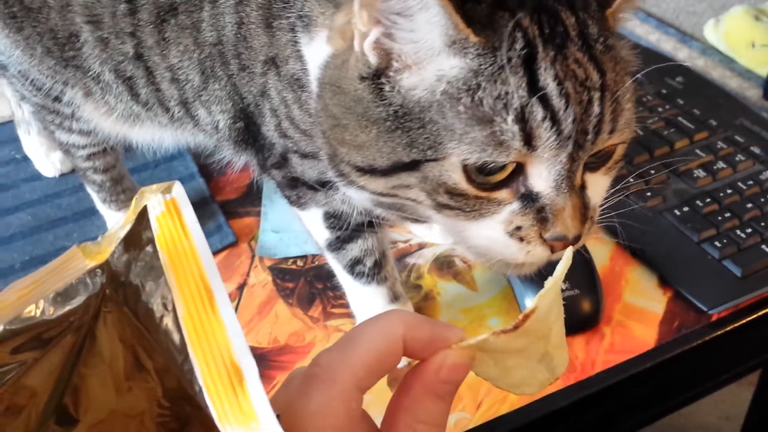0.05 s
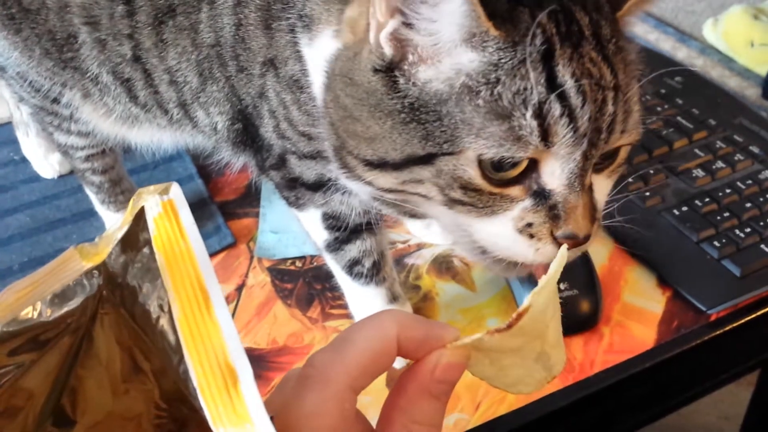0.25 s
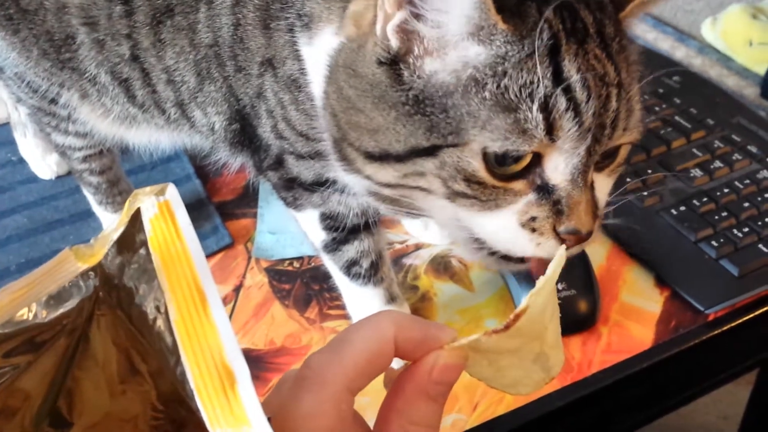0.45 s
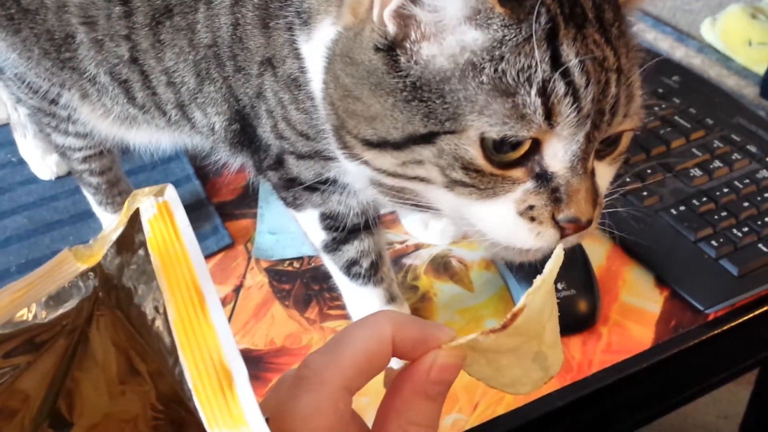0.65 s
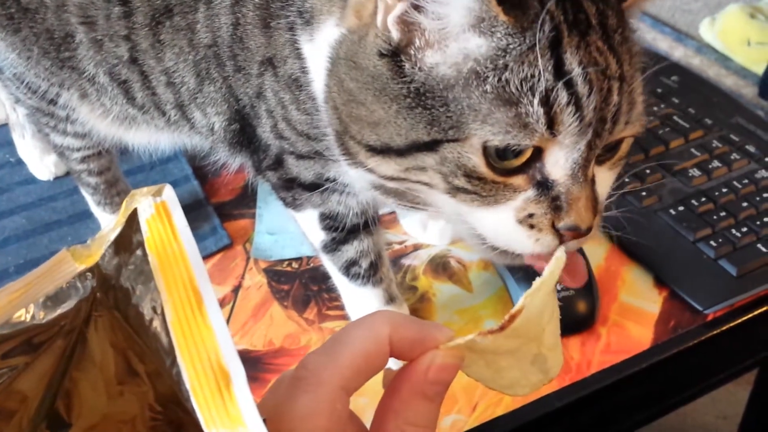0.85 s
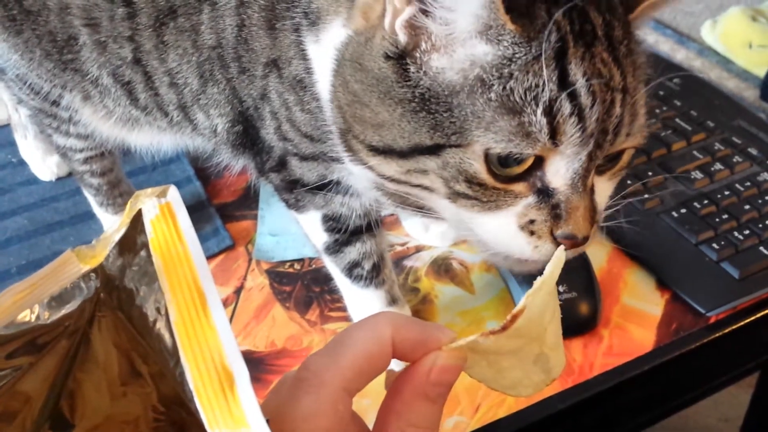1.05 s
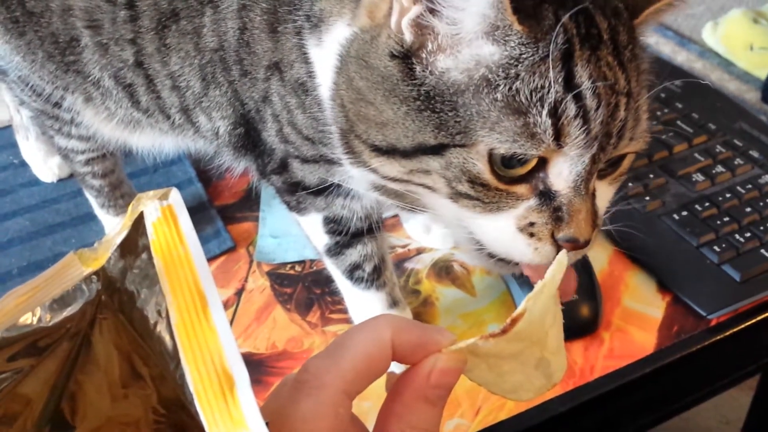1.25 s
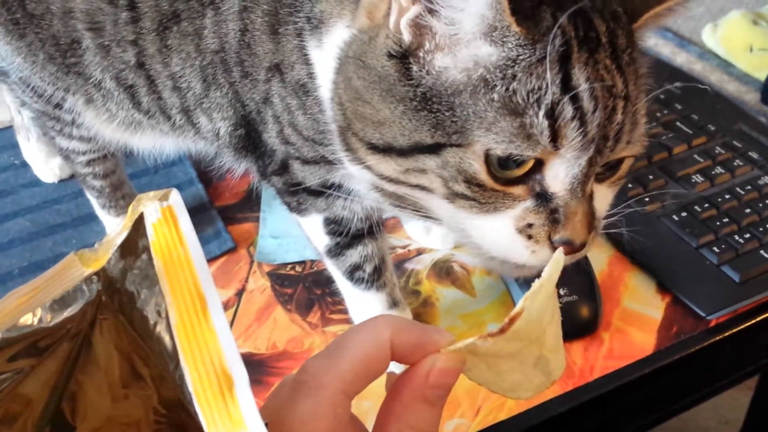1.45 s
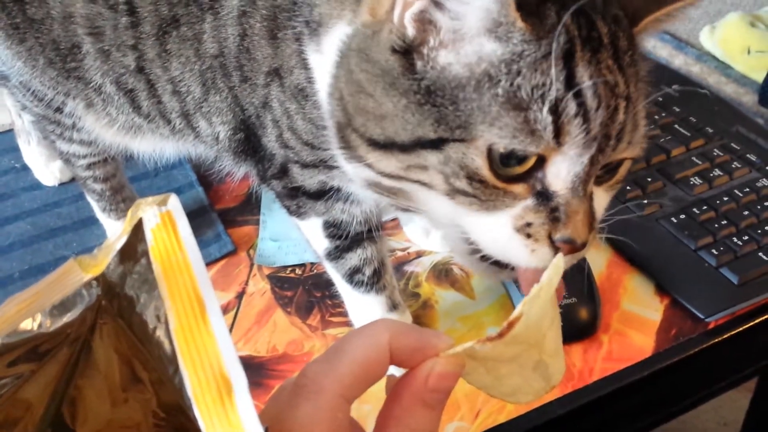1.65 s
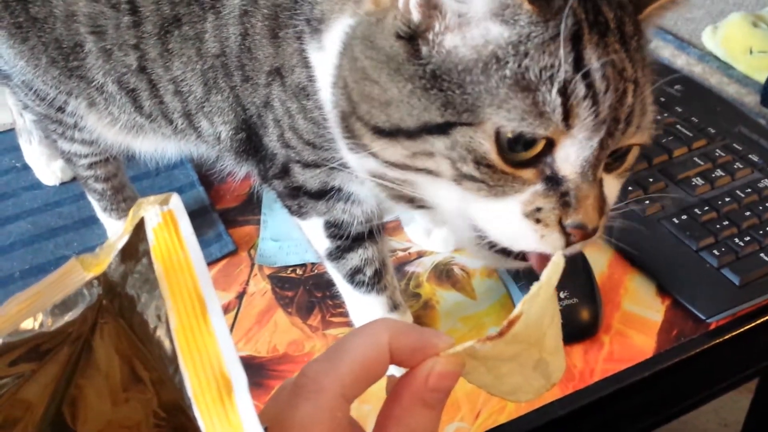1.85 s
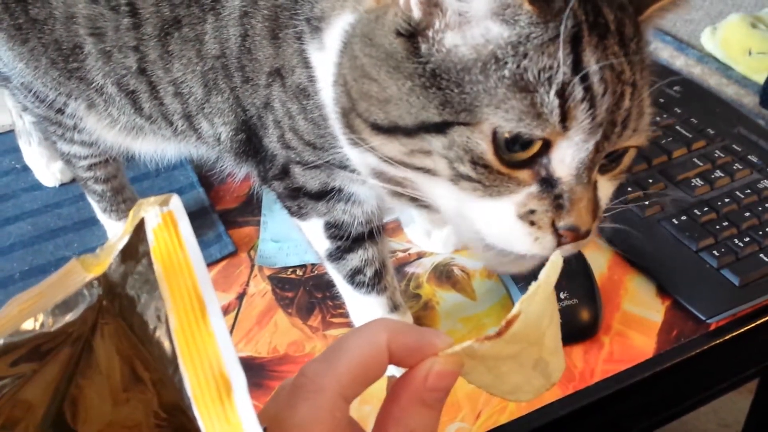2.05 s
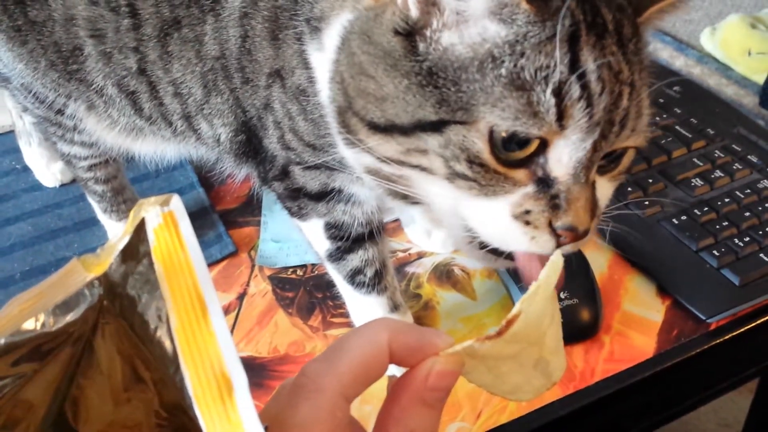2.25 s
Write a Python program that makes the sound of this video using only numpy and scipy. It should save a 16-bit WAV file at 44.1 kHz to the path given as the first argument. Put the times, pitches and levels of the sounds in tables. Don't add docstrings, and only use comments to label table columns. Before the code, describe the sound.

A cat licking a thin potato crisp very close to a stereo microphone: a sharp bright crack early, faint rasping licks and wet ticks, a softer crack midway, a small pop late, low appliance hum in a small room.

```python
import sys
import numpy as np
from scipy import signal
from scipy.io import wavfile

SR = 44100
rng = np.random.default_rng(int(sys.argv[2]) if len(sys.argv) > 2 else 0)


def level_to_linear(level):
    exponent = np.asarray(level, float) / 20
    return 10 ** exponent


def unload_audio(sound):
    columns = np.transpose(np.atleast_2d(sound))
    steps = np.round(np.clip(columns, -1, 1) * 32767)
    wavfile.write(sys.argv[1], SR, steps.astype(np.int16))


N = 101430
RIGHT_LEADS_S = 0.00016
SWELL_SHAPE = 1.4
CRACK_S, SOFT_CRACK_S = .2438, 1.3256


def ports(left_db, right_db):
    return level_to_linear(np.array([[left_db], [right_db]]))


def pan(left_over_right_db):
    return ports(left_over_right_db / 2, -left_over_right_db / 2)


def rms_one(x):
    return x / np.sqrt(np.mean(x ** 2) + 1e-20)


def at_hz(points, hz, column=1):
    points = np.array(points)
    return np.interp(np.log(hz), np.log(points[:, 0]), points[:, column])


def resonance(x, hz, width_hz):
    r = np.exp(-np.pi * width_hz / SR)
    zeros = np.array([1, 0, -1]) * (1 - r * r) / 2
    poles = [1, -2 * r * np.cos(2 * np.pi * hz / SR), r * r]
    return signal.lfilter(zeros, poles, x)


def narrow(x, hz, width_hz):
    return rms_one(resonance(resonance(x, hz, width_hz), hz, width_hz))


def bands(per_octave=3):
    edges = 30 * 2 ** np.arange(0, 9.2, 1 / per_octave)
    settle = 4000
    white = rng.standard_normal((2, 2, N + settle))
    for k, (low, high) in enumerate(zip(edges, edges[1:])):
        sos = signal.butter(2, [low, high], "band", fs=SR, output="sos")
        yield np.sqrt(low * high), signal.sosfilt(sos, white[k % 2])[:, settle:]


def add_mode(out, start_s, hz, ms, left_db, right_db):
    first = int(start_s * SR) - 20
    n = np.arange(first, min(first + 4000, N))
    t = np.maximum(n / SR - start_s + np.array([[0], [RIGHT_LEADS_S]]), 0)
    u = t / ms * 1000
    envelope = (u * np.exp(1 - u)) ** SWELL_SHAPE
    out[:, n] += ports(left_db, right_db) * envelope * np.sin(2 * np.pi * hz * t)


def timed_modes(table):
    out = np.zeros((2, N))
    for start_s, hz, left_db, right_db, ms in table:
        add_mode(out, start_s, hz, ms, left_db, right_db)
    return out


def stroke(centre_s, db, length_s):
    return level_to_linear(db) * np.exp(-.5 * ((np.arange(N) / SR - centre_s) / length_s) ** 2)


def grains(per_s):
    return rng.standard_normal((2, N)) * (rng.random((2, N)) < per_s / SR)


# time_s, level_db
HUM_SWELL = [(0, 2), (.35, 3), (.7, -0.5), (.88, -8), (1.1, 1), (1.5, 0.5), (1.85, 1.5), (2.1, 3.5),
             (2.3, -5.5)]


def hum_swell():
    return level_to_linear(np.interp(np.arange(N) / SR, *np.transpose(HUM_SWELL)))


# pitch_hz, width_hz, level_db (rms)
HUM_MODES = [(122, 13.4, -64.5), (165.5, 8.1, -67), (220.2, 31, -66), (251.6, 10, -63.5),
             (281.1, 28, -59.5), (420, 23, -82.5), (767, 36, -77), (1004, 300, -76)]
# pitch_hz, left_over_right_db
PORT_LEAN = [(100, 1), (290, -2), (1400, 2.5), (3500, -0.5), (5500, -3.5), (7500, -12.5), (10000, -3.5),
             (15000, -1)]
HUM_SIDE_DB = -18.5


def hum():
    out = 0
    for hz, width_hz, db in HUM_MODES:
        noise = rng.standard_normal((2, N + SR))
        ringing = resonance(resonance(noise, hz, width_hz), hz, 2 * width_hz)
        mid, side = rms_one(ringing[:, SR:])
        pair = mid + level_to_linear(HUM_SIDE_DB) * side * [[1], [-1]]
        out = out + level_to_linear(db) * pair * pan(at_hz(PORT_LEAN, hz))
    return out


# pitch_hz, level_db (per Hz)
AIR_SPECTRUM = [(18, -67), (30, -27.5), (112, -7), (189, -8.5), (266, -10.5), (554, -17), (2120, -25),
                (6720, -29.5), (16000, -33)]
# pitch_hz, likeness (-1 opposite, 0 unrelated, 1 same)
PORT_LIKENESS = [(60, 0.79), (180, 1), (550, 0.5), (1650, 0.042), (4970, -0.21), (15000, 0.052)]
AIR_DB = -58


def air():
    out = 0
    for hz, (mid, side) in bands():
        alike = np.clip(at_hz(PORT_LIKENESS, hz), -1, 1)
        pair = np.sqrt(1 + alike) * mid + np.sqrt(1 - alike) * side * [[1], [-1]]
        out = out + pair * level_to_linear(at_hz(AIR_SPECTRUM, hz)) * pan(at_hz(PORT_LEAN, hz))
    return level_to_linear(AIR_DB) * rms_one(out)


# pitch_hz, width_hz, left_db, right_db
PORT_CAVITIES = [(5500, 3000, -71, -79), (6970, 900, -84.5, -74.5), (8300, 1400, -81.5, -73)]


def port_hiss():
    out = 0
    for hz, width_hz, left_db, right_db in PORT_CAVITIES:
        out = out + narrow(rng.standard_normal((2, N)), hz, width_hz) * ports(left_db, right_db)
    return out


# start_s, level_db
# (peak), pitch_hz, rise_and_fall_ms, left_over_right_db
WET_TICKS = [(.1482, -41.5, 890, 2.0, 0), (.1515, -50, 1080, 1.5, 0), (.1638, -42.5, 1010, 1, 0),
             (.1625, -48, 1700, 2, 6), (.1632, -56, 2980, 1.2, 11.5), (.689, -52, 3200, .25, 16),
             (.92, -55, 3000, .8, 6), (.937, -56, 5700, .8, 8), (.954, -55, 6500, .8, 0),
             (1.037, -53, 1720, 1.5, 6), (1.045, -49, 1720, .9, 6), (1.045, -51, 1100, .8, 3),
             (1.16, -56, 1530, .35, 13), (1.3495, -54, 2400, 1.1, 16), (1.471, -56, 5000, .4, 6),
             (1.556, -53, 3000, .2, 8), (1.6062, -54, 2200, .6, 10), (1.615, -50.5, 5900, .5, 17.5),
             (1.6142, -53, 5000, .4, 14), (1.6148, -55, 2100, .7, 14), (1.898, -50, 420, 2.6, 12),
             (1.911, -50.5, 85, 10, -2), (1.919, -56, 1900, 1, 6), (1.975, -55, 5000, .6, 8),
             (2.067, -48.5, 2920, .55, 10.5), (2.102, -55, 2200, .45, 9), (2.176, -56, 6800, .8, 0),
             (2.23, -53, 6500, .9, -6), (2.288, -58, 6000, .8, 6), (.251, -44, 400, 3.8, 0),
             (.259, -50, 260, 6, 0)]


def ticks():
    out = np.zeros((2, N))
    for start_s, db, hz, ms, pan_db in WET_TICKS:
        add_mode(out, start_s, hz, ms, db + pan_db / 2, db - pan_db / 2)
    return out


# pitch_hz, left_db, right_db, rise_and_fall_ms
CRACK_MODES = [(1710, -16.5, -24.5, .47), (2090, -21.5, -50, .46), (2680, -36, -38, 1.0),
               (3620, -31, -27, .6), (4330, -27, -36, 1.0), (5200, -39.5, -15.5, .59),
               (5690, -4.5, -24.5, .54), (5970, -14, -31.5, .79), (7720, -30.5, -24.5, .71),
               (8440, -57, -27, .7), (8940, -27.5, -8, .33), (9590, -29.5, -24.5, .49),
               (13030, -33, -21, .2), (14000, -41.5, -25.5, .43)]
# delay_ms, left_db, right_db
CRACK_ECHOES = [(2.2, -22, -22), (5.0, -33, -40)]
# start_s, pitch_hz, left_db, right_db, rise_and_fall_ms
OBJECT_ANSWERS = [
    (0.2457, 5410, -16.0, -27.5, 0.51),
    (0.2452, 8960, -49.5, -32.5, 0.94),
    (0.2455, 2090, -37.5, -42.5, 0.99),
    (0.2452, 10540, -40.5, -28.5, 0.44),
    (0.2456, 7170, -35.5, -37.0, 0.62),
]


def loud_crack():
    out = timed_modes(OBJECT_ANSWERS)
    for hz, left_db, right_db, ms in CRACK_MODES:
        for delay_ms, echo_left_db, echo_right_db in [(0, 0, 0)] + CRACK_ECHOES:
            start_s = CRACK_S + delay_ms / 1000
            add_mode(out, start_s, hz, ms, left_db + echo_left_db, right_db + echo_right_db)
    return out


# pitch_hz, left_db, right_db, t60_s
TAIL_BANDS = [(400, -78, -73, 0.27), (900, -70, -54, 0.14), (1850, -50.5, -54.5, 0.28),
              (3200, -59, -51.5, 0.18), (4600, -58.5, -64, 0.43), (6600, -65, -61, 0.36),
              (8360, -70, -58.5, 0.34), (11000, -77.5, -60.5, .15), (14000, -89.5, -62, .12)]
# pitch_hz, width_hz, left_db, right_db, t60_s
PORT_RINGS = [(5500, 1300, -38, -46, 0.34), (8300, 1200, -65, -52, 0.197)]
TAIL_START_S, TAIL_EARLY_DB, SOFT_TAIL_DB = 0.0075, -9, -18.5
TAIL_LUMP_DB, TAIL_LUMPS_PER_S = 1.6, 300


def dying(t60_s):
    t = np.arange(N) / SR
    out = 0
    for crack_s, db in [(CRACK_S, 0), (SOFT_CRACK_S, SOFT_TAIL_DB)]:
        fall_db = -60 * np.maximum(t - crack_s, 0) / t60_s
        early_db = TAIL_EARLY_DB * (t < crack_s + TAIL_START_S)
        out = out + (t > crack_s + .002) * level_to_linear(db + fall_db + early_db)
    return out


def lumps():
    r = np.exp(-2 * np.pi * TAIL_LUMPS_PER_S / SR)
    slow = signal.lfilter([1], [1, -2 * r, r * r], rng.standard_normal((2, N)))
    return level_to_linear(TAIL_LUMP_DB * rms_one(slow))


def tails():
    out = 0
    for hz, noise in bands():
        level = ports(at_hz(TAIL_BANDS, hz), at_hz(TAIL_BANDS, hz, column=2)) * level_to_linear(22.5)
        out = out + dying(at_hz(TAIL_BANDS, hz, column=3)) * noise * level
    for hz, width_hz, left_db, right_db, t60_s in PORT_RINGS:
        ring = narrow(rng.standard_normal((2, N)), hz, width_hz)
        out = out + dying(t60_s) * ring * ports(left_db, right_db)
    return lumps() * out


# start_s, pitch_hz, left_db, right_db, rise_and_fall_ms
SPLINTER_MODES = [(.2518, 6550, -31, -39.5, .8), (.2522, 3300, -40, -32, .6), (.254, 3200, -36, -40, .5),
                  (.2528, 1990, -34, -50, .5), (.2533, 8500, -50, -33, .5), (.2546, 1500, -32, -36, .4),
                  (.255, 4500, -37, -48, .4), (.2575, 8200, -52, -41, .5), (.258, 5600, -36, -49, .8),
                  (.2612, 8500, -53, -37, .5), (.265, 5700, -38, -50, .7), (.265, 7500, -55, -41, .4),
                  (.2675, 5760, -36, -46, .7), (.2672, 7300, -50.5, -38, .5), (.273, 5600, -36, -41, .8),
                  (.279, 5500, -38, -50, .9)]


def splinters():
    return timed_modes(SPLINTER_MODES)


# centre_s, level_db, length_s, pitch_hz
LICK_STROKES = [
    (0.468, -67, .01, 6800),
    (.5, -63.5, 0.013, 6300),
    (0.936, -70, 0.0081, 5800),
    (0.947, -68, 0.0085, 6660),
    (1.342, -67, 0.013, 5170),
    (1.39, -64, 0.0081, 6900),
    (1.881, -66, 0.031, 5950),
    (2.29, -69.5, 0.0073, 6000),
]
RASP_WIDTH_HZ, RASP_GRAINS_PER_S, RASP_PAN_DB = 1600, 4000, 10


def rasp():
    barbs = grains(RASP_GRAINS_PER_S)
    out = 0
    for centre_s, db, length_s, hz in LICK_STROKES:
        out = out + stroke(centre_s, db, length_s) * narrow(barbs, hz, RASP_WIDTH_HZ)
    return out * pan(RASP_PAN_DB)


# centre_s, level_db, length_s, low_hz, high_hz
WET_SMACKS = [
    (.498, -66, .01, 1500, 5000),
    (1.048, -63, .004, 500, 1900),
    (1.334, -57, .005, 300, 1500),
    (1.345, -64, .007, 2000, 7000),
    (1.9, -61, .003, 1200, 3300),
]
SMACK_GRAINS_PER_S, SMACK_PAN_DB = 6100, 7


def smacks():
    drops = grains(SMACK_GRAINS_PER_S)[0]
    out = 0
    for centre_s, db, length_s, low_hz, high_hz in WET_SMACKS:
        sos = signal.butter(2, [low_hz, high_hz], "band", fs=SR, output="sos")
        out = out + stroke(centre_s, db, length_s) * rms_one(signal.sosfilt(sos, drops))
    return out * pan(SMACK_PAN_DB)


# pitch_hz, left_db, right_db, rise_and_fall_ms
SOFT_MODES = [(4440, -39, -41.5, .5), (5050, -32.5, -45.5, .4), (5750, -34, -44, .34),
              (6450, -38, -46, .45), (9320, -53, -36, .2), (13910, -70, -42, .1)]
# delay_ms, level_db
CRACK_STEPS = [
    (0, -13),
    (.45, 0),
    (1.25, -10.5),
    (2.0, -6),
]
# start_s, pitch_hz, left_db, right_db, rise_and_fall_ms
SOFT_BODY_MODES = [
    (1.326, 1230, -28, -30, .55),
    (1.3262, 2620, -32.5, -37, .9),
    (1.3259, 860, -43, -45, 1.2),
    (1.326, 1860, -39, -45, .7),
    (1.3268, 5730, -40.5, -55, .85),
]


def soft_crack():
    out = timed_modes(SOFT_BODY_MODES)
    for hz, left_db, right_db, ms in SOFT_MODES:
        for delay_ms, db in CRACK_STEPS:
            add_mode(out, SOFT_CRACK_S + delay_ms / 1000, hz, ms, left_db + db, right_db + db)
    return out


# start_s, pitch_hz, left_db, right_db, rise_and_fall_ms
RELEASE_MODES = [
    (1.8987, 1650, -40.5, -49.5, 1.58),
    (1.8999, 5610, -47.0, -82.0, 1.18),
    (1.8998, 3120, -50.5, -65.0, 0.99),
    (1.8999, 2330, -38.0, -47.0, 0.1),
    (1.8968, 5420, -47.5, -69.0, 0.76),
    (1.8987, 8460, -55.0, -45.0, 0.09),
]


def tongue_release():
    return timed_modes(RELEASE_MODES)


# start_s, pitch_hz, left_db, right_db, rise_and_fall_ms
POP_MODES = [
    (2.1851, 2750, -32.5, -38, .38),
    (2.1849, 1950, -38, -42, .5),
    (2.1852, 3500, -40, -46, .6),
    (2.1829, 2700, -48, -56, .8),
    (2.1863, 2810, -50, -42, .3),
    (2.1853, 5200, -52, -54, .45),
    (2.1879, 2900, -47, -50, .4),
]


def crumb_pop():
    return timed_modes(POP_MODES)


def scene():
    snaps = loud_crack() + splinters() + soft_crack() + tongue_release() + crumb_pop()
    thin = signal.butter(2, 1120, "high", fs=SR, output="sos")
    steady = hum_swell() * hum() + air() + port_hiss() + tails() + rasp() + smacks()
    band_edge = signal.cheby2(22, 60, 15950, fs=SR, output="sos")
    return ticks() + signal.sosfilt(thin, snaps) + signal.sosfilt(band_edge, steady)


def low_pass(x):
    return signal.sosfilt(signal.butter(12, 16000, fs=SR, output="sos"), x)


def record(dry):
    return low_pass(dry)


dry = scene()
out = record(dry)
unload_audio(out)
```